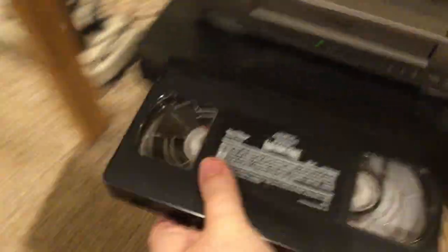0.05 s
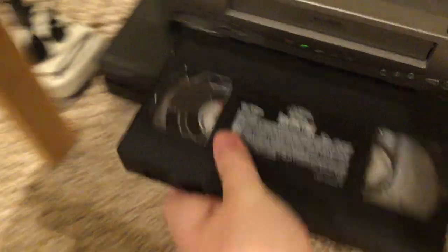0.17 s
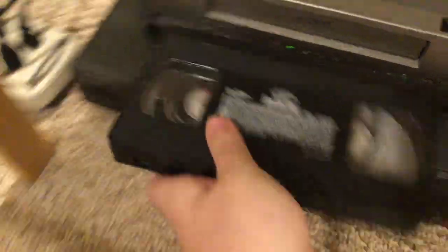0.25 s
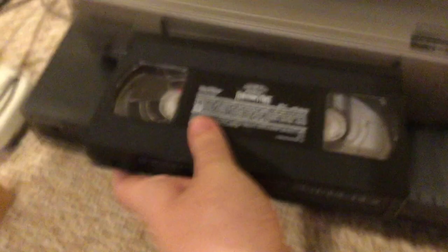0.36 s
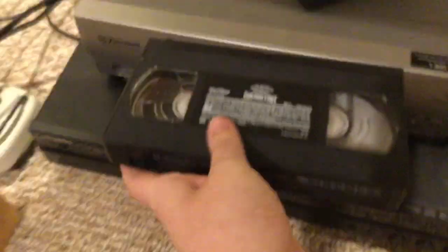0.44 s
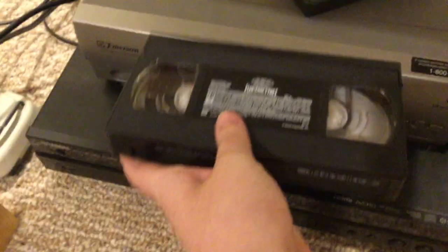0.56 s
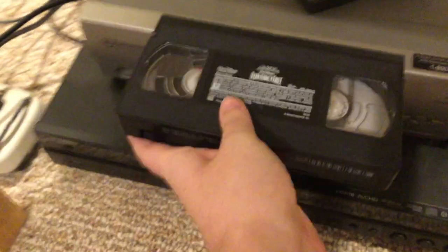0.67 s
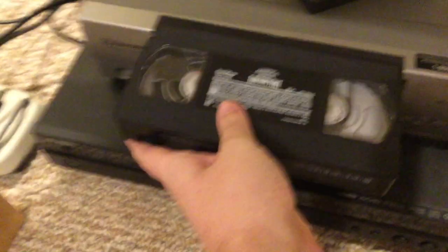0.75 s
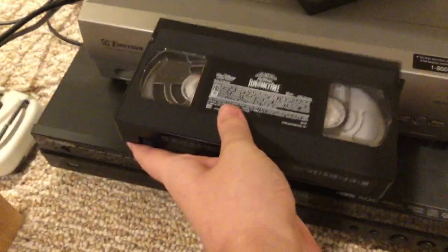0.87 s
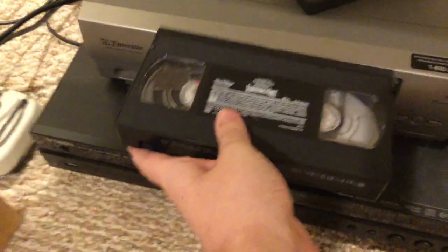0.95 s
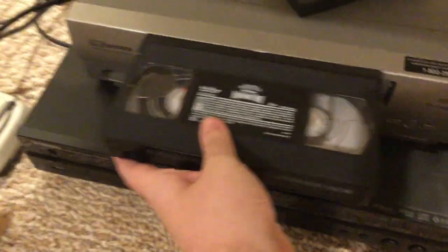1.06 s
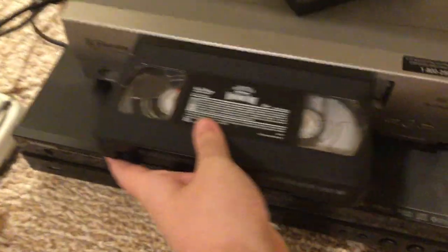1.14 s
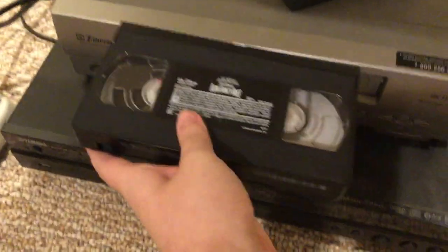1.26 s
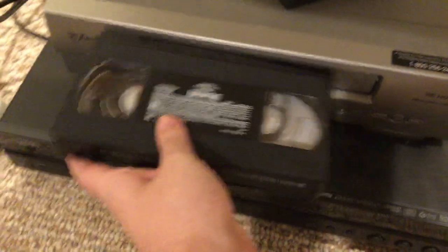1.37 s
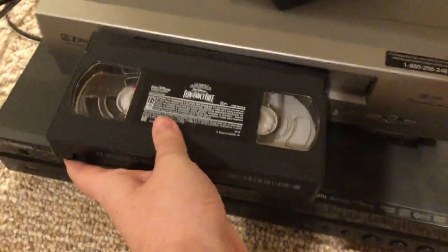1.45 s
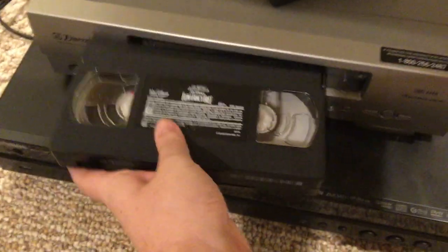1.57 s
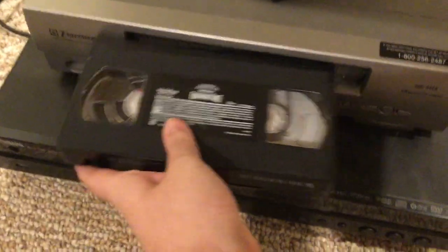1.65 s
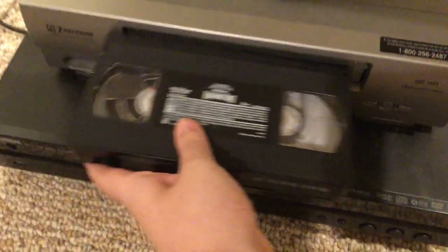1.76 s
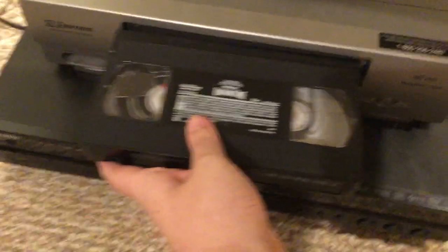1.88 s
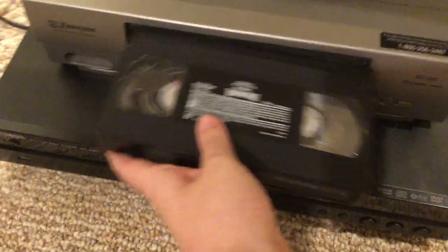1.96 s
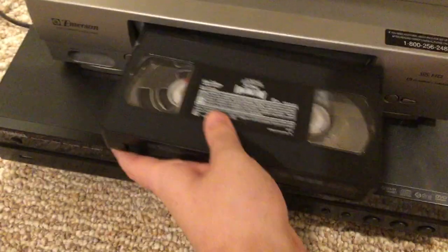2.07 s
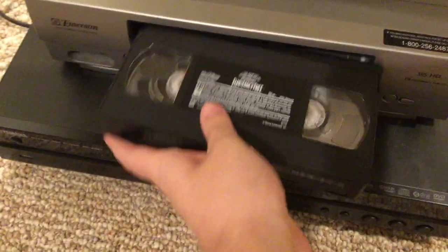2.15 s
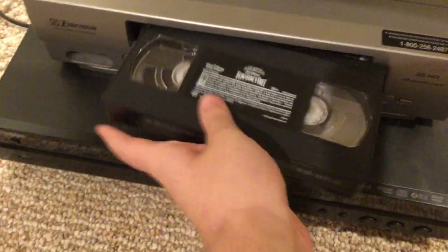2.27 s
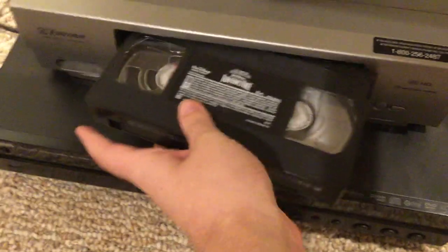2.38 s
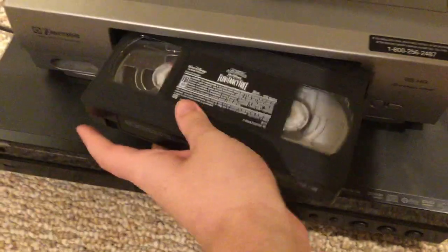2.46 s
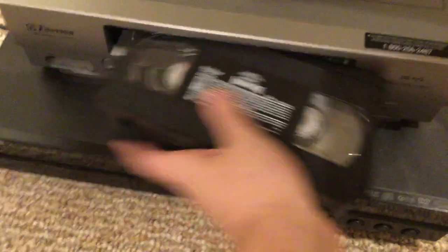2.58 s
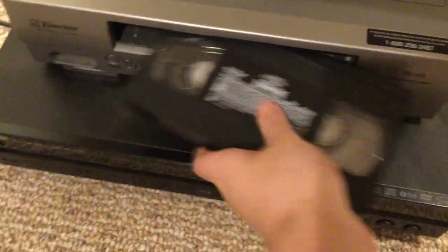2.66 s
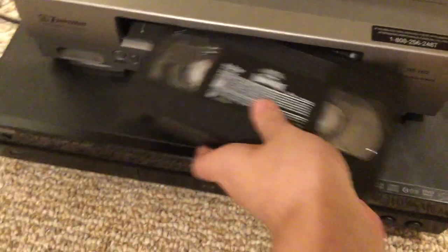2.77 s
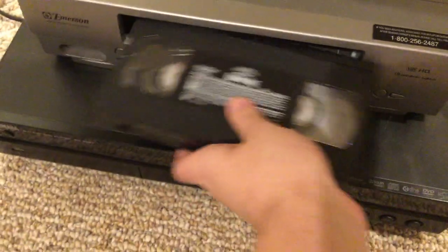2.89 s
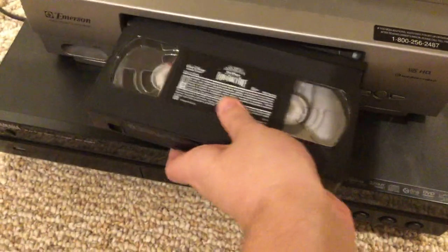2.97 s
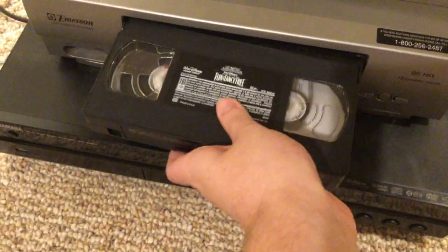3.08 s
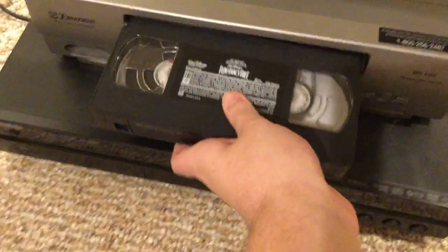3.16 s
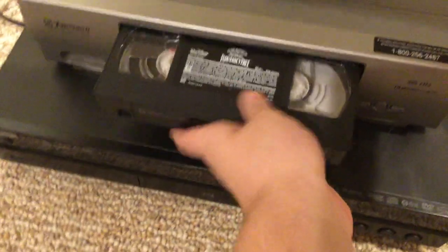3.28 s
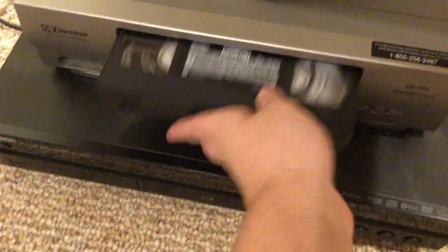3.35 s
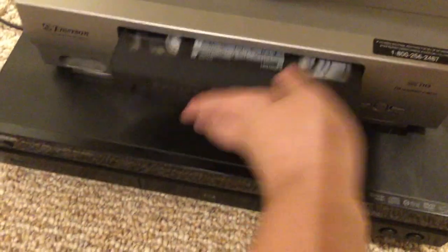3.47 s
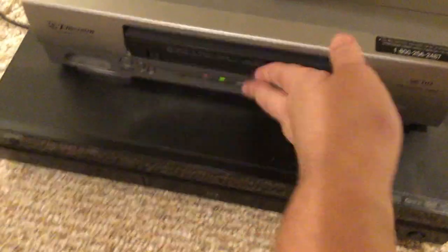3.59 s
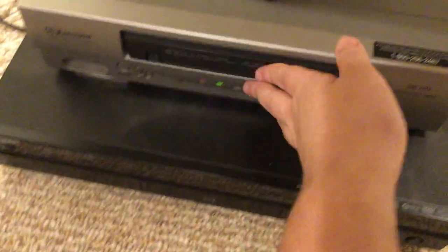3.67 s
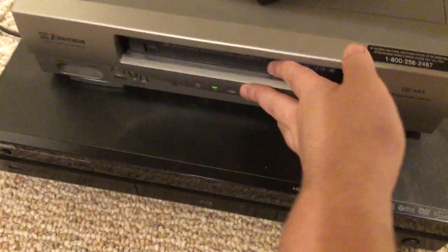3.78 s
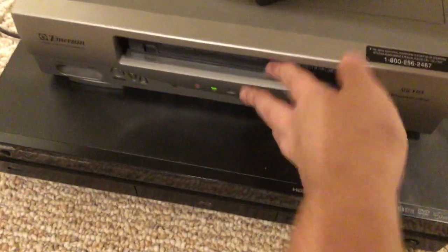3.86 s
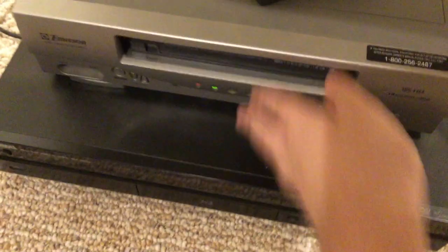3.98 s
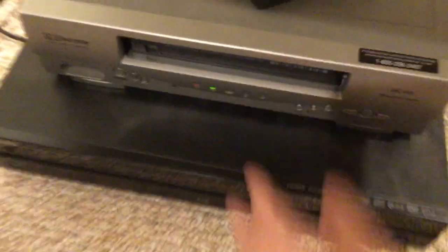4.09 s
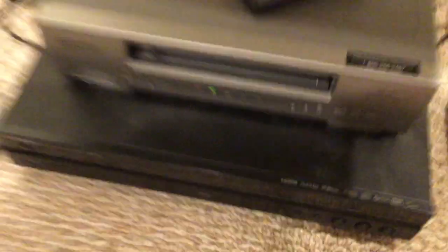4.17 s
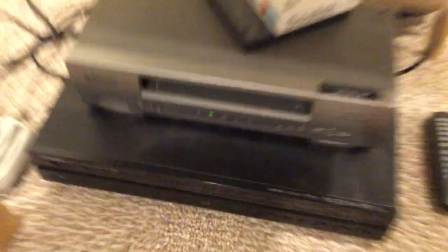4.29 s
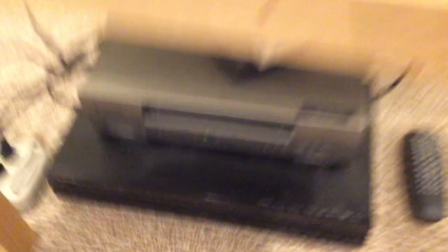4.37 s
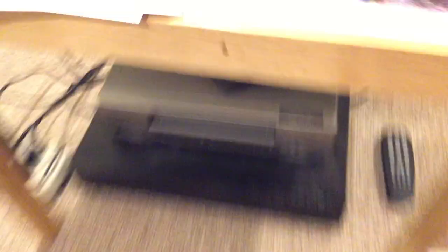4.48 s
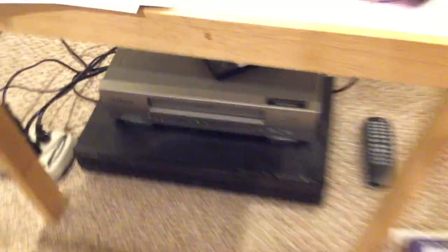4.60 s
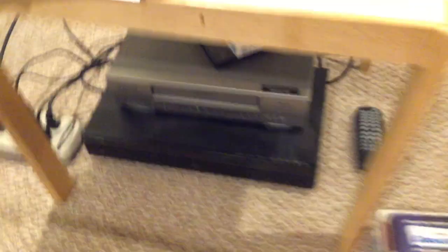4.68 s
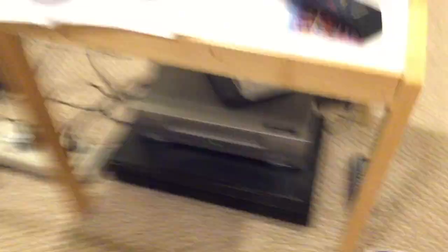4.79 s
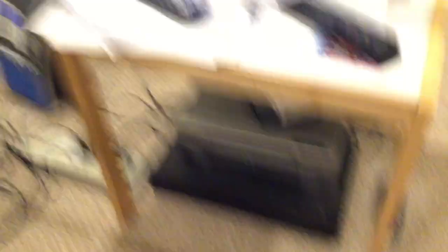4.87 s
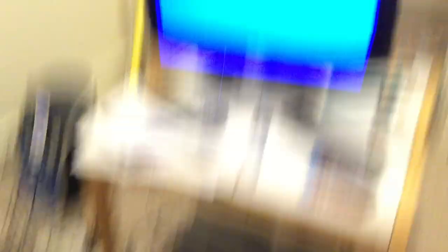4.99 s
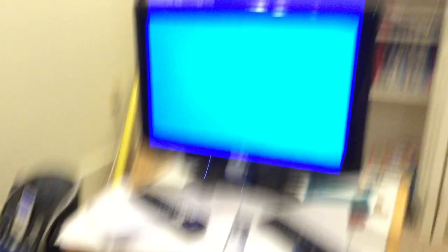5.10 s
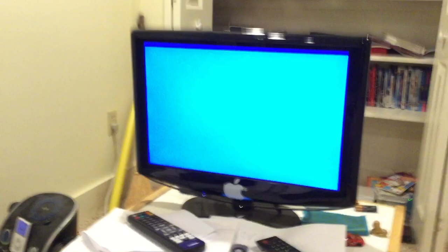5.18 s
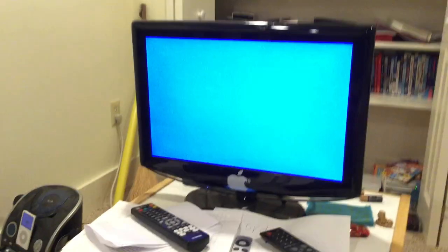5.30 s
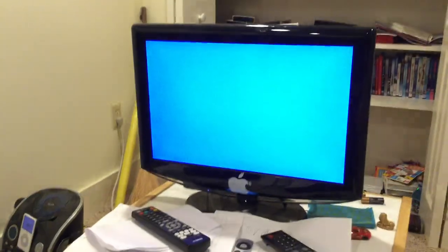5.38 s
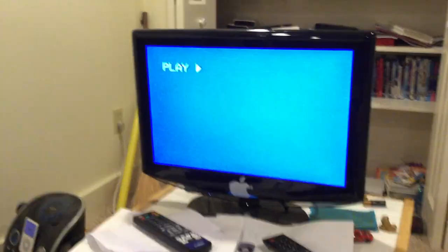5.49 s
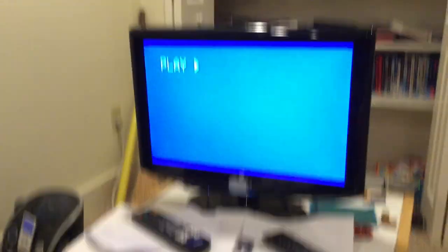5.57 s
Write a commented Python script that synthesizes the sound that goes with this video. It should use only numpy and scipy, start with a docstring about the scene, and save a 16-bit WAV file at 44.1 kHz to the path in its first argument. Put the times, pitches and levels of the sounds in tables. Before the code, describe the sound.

A hollow plastic video cassette knocks, scrapes and clatters against a player, slides into its slot, and a flap snaps shut.

```python
"""A video cassette is handled with faint clicks, then knocked hard on the front of a player near 0.5 s.
It is scraped along the front and pushed into the slot: grains of friction and blows ring its hollow plastic
shell, modelled as resonances over dense weak modes, and the cabinet's modes knock and drum underneath.
The slot flap snaps shut near 4.2 s; a few more slides follow and the handling fades after 5.2 s.
Throughout, a small room answers the blows, soft bumps reach the hand-held microphone and the air hums."""
import sys
import numpy as np
from scipy import signal
from scipy.fft import rfft, irfft, next_fast_len
from scipy.io import wavfile
from scipy.ndimage import map_coordinates

SR = 44100
rng = np.random.default_rng(int(sys.argv[2]) if len(sys.argv) > 2 else 0)


def inscribe(sig):
    """Save sig as 16-bit PCM at rate SR to the path in sys.argv[1].

    A 1-D sig is mono; a 2-D sig holds one channel per row.
    Samples are clipped to [-1, 1] before scaling.
    """
    pcm = np.round(np.clip(np.atleast_2d(sig).T, -1, 1) * 32767)
    wavfile.write(sys.argv[1], SR, pcm.astype(np.int16))


N = 248679
AGE_S = np.arange(SR // 3) / SR  # time since a blow

# cabinet modes: (frequency [Hz], width [Hz], level [dB])
CABINET_MODES = [(180, 69, -9), (242.4, 33, 1), (281.5, 56, -2.5), (369.5, 44.5, -1), (425, 37.2, -8),
                 (591, 45, -15), (767, 29, -21.5)]
# spectra of the shell's ringing, main and upper-mid register: (frequency [Hz], level [dB])
BODY_SPECTRUM = [(100, -25), (300, -2), (600, -1.5), (1400, -3), (2000, 1.5), (3000, -7.5), (5000, -20.5),
                 (9000, -45.5)]
EDGE_SPECTRUM = [(1000, -49.5), (2200, -20), (3000, 7.5), (4500, 0), (6000, -8.5), (9000, -13.5),
                 (16000, -52.5)]
# pushes that make plastic slide:
# (start [s], length [s], scrape level [dB], cabinet drone level [dB], hiss level [dB])
STROKES = [(0.038, 0.082, -80, -87, -78), (0.282, 0.45, -76, -90, -76.5), (0.497, 0.14, -61, -81, -84),
           (0.962, 0.14, -57, -49.5, -74), (1.136, 0.18, -71, -52.5, -79), (1.198, 0.16, -62, -50.5, -73.5),
           (1.394, 0.22, -53, -46, -68.5), (1.608, 0.23, -57, -52.5, -78), (1.773, 0.14, -59, -47, -66),
           (2.074, 0.34, -61, -41.5, -69), (2.315, 0.078, -44, -42.5, -67),
           (2.412, 0.069, -58.5, -40.5, -85), (2.589, 0.11, -56, -44, -70), (2.678, 0.16, -44, -48.5, -59),
           (2.87, 0.15, -43.5, -48, -57.5), (3.043, 0.14, -47, -36.5, -58), (3.192, 0.16, -66.5, -55, -92),
           (3.293, 0.23, -54.5, -49, -72.5), (3.383, 0.28, -51.5, -43.5, -66.5),
           (3.596, 0.13, -39, -38.5, -51), (3.796, 0.12, -52.5, -45, -74), (3.918, 0.2, -66, -53, -76),
           (4.149, 0.2, -57.5, -51.5, -72.5), (4.375, 0.12, -47.5, -45, -64),
           (4.451, 0.052, -37.5, -37.5, -44.5), (4.553, 0.13, -60, -56, -72.5),
           (4.704, 0.13, -57, -52, -70), (4.836, 0.25, -70, -62.5, -76.5), (5.247, 0.15, -77, -64.5, -95.5)]


def amp(db):
    """Decibels to gain."""
    return 10 ** (np.asarray(db) / 20)


def unit(x):
    """Scale to rms 1."""
    return x / np.sqrt(np.mean(x ** 2) + 1e-20)


def along(points, hz):
    """Read (Hz, value) points on a log frequency axis."""
    f, v = np.transpose(points)
    return np.interp(np.log(hz + 1), np.log(f + 1), v)


def filtered(x, response):
    """Multiply the spectrum of x by a response of frequency."""
    m = next_fast_len(len(x) + SR // 4)
    spectrum = rfft(x, m) * response(np.fft.rfftfreq(m, 1 / SR))
    return irfft(spectrum, m)[:len(x)]


def resonances(modes, f):
    """Causal response of damped modes in parallel, with alternating signs."""
    total = 0
    for k, (centre_hz, width_hz, db) in enumerate(modes):
        damping = 1j * f * width_hz
        total = total + (-1) ** k * amp(db) * damping / (centre_hz * centre_hz - f * f + damping)
    return total


def wobble(rate_hz):
    """Smooth random curve through rate_hz knots a second."""
    knots = rng.standard_normal(int(N * rate_hz / SR) + 4)
    return map_coordinates(knots, [np.arange(N) * rate_hz / SR])


def decay(t60_s):
    """Exponential decay of a blow."""
    return amp(-60 * AGE_S / t60_s)


def growth(t60_s):
    """Decay reversed in time: swells up to a blow."""
    return amp(-60 * AGE_S[::-1] / t60_s)


def fade(t60_s, rise_s):
    """Envelope of a blow: quick rise, exponential decay."""
    return decay(t60_s) * (1 - np.exp(-AGE_S / rise_s))


def add(track, time_s, sound):
    """Mix a sound into the track at time_s."""
    part = track[max(round(time_s * SR), 0):][:len(sound)]
    part += sound[:len(part)]


def air(level_db=-68, hum_hz=122, hum_db=-74):
    """Room tone as shaped noise, with the appliances' low hum as a phase-wandering sine."""
    # room tone spectrum: (frequency [Hz], level [dB])
    tone_spectrum = [(20, -23.5), (50, 3), (95, -4.5), (134, 11), (165, -2.5), (300, 0), (400, -21.5),
                     (900, -31.5), (2000, -18), (4500, -38), (12000, -31), (16000, -34)]
    rumble = unit(filtered(rng.standard_normal(N), lambda f: amp(along(tone_spectrum, f))))
    hum = np.sin(2 * np.pi * hum_hz * np.arange(N) / SR + 0.68 * wobble(24))
    return amp(level_db) * rumble + amp(hum_db) * hum


def room(x, build_up_s=0.0015):
    """The room's answer: a noise tail in which each frequency dies at its own speed."""
    # reverberation: (frequency [Hz], t60 [s])
    reverb_t60 = [(100, 0.49), (300, 0.24), (1500, 0.14), (4000, 0.14), (12000, 0.089)]
    hz, t, z = signal.stft(rng.standard_normal(SR // 2), SR, nperseg=256)
    decaying = z * amp(-60 * t / along(reverb_t60, hz)[:, None])
    tail = signal.istft(decaying, SR, nperseg=256)[1]
    tail *= 1 - np.exp(-(np.arange(len(tail)) / SR / build_up_s) ** 2)
    return signal.fftconvolve(x, tail / np.linalg.norm(tail))[:N]


def bumps(level_db=-2, low_hz=50, high_hz=170, rise_s=0.002, push_t60_s=0.035, rumble_gain=0.39):
    """Soft, heavy contacts leave a low damped push and a short noisy shudder."""
    # dull bumps: (time [s], level [dB re level_db], shudder t60 [s], push pitch [Hz])
    bump_events = [(0.301, -54, 0.049, 75), (0.463, -29, 0.097, 118), (0.686, -49, 0.089, 55),
                   (3.604, -36, 0.095, 105), (3.825, -44, 0.085, 96), (4.499, -37.5, 0.2, 104),
                   (4.863, -48, 0.15, 113), (5.264, -50.5, 0.036, 72), (5.337, -52.5, 0.08, 130),
                   (5.404, -48, 0.06, 67)]
    out = np.zeros(N)
    band = signal.butter(3, [low_hz, high_hz], "bandpass", fs=SR, output="sos")
    low_cut = signal.butter(2, low_hz, "highpass", fs=SR, output="sos")
    for time_s, db, t60_s, hz in bump_events:
        push = signal.sosfilt(low_cut, np.sin(2 * np.pi * hz * AGE_S) * decay(push_t60_s))
        rumble = unit(signal.sosfilt(band, rng.standard_normal(len(AGE_S)))) * fade(t60_s, rise_s)
        thud = push + rumble_gain * rumble
        add(out, time_s, amp(db + level_db) * thud / abs(thud).max())
    return out


def shell(f, dense_db):
    """Gain of the cassette shell: a few strong resonances over many weak ones."""
    # shell modes: (frequency [Hz], width [Hz], level [dB])
    shell_modes = [(530, 230, 1.5), (811.5, 22, 5), (998, 74, -1), (1164, 85, 5), (1487, 100, 0),
                   (1895, 170, -9), (2356, 130, -2), (2910, 170, -8.5), (3620, 250, -13), (4940, 140, -7.5),
                   (11100, 310, -11)]
    return np.hypot(abs(resonances(shell_modes, f)), amp(dense_db))


def shell_ring(spectrum, note_hz, note_db=4, note_q=7):
    """Undamped ringing of the shell's crowded modes; the struck panel stands out."""
    f = np.fft.rfftfreq(len(AGE_S), 1 / SR)
    panel = np.hypot(1, abs(resonances([(note_hz, note_hz / note_q, note_db)], f)))
    colour = amp(along(spectrum, f)) * shell(f, dense_db=-6) * panel
    return unit(irfft(rfft(rng.standard_normal(len(AGE_S))) * colour, len(AGE_S)))


def pushes(t, stop_t60_s, attack_s=0.034, swell_db=1.5, arch_db=3.5):
    """Power of each push (rows) at times t: gets moving, swells with speed and pressure, dies away."""
    start, length = np.transpose(STROKES)[:2, :, None]
    moving = np.clip((t - start) / attack_s, 0, 1)
    way = np.clip((t - start) / length, 0, 1)
    # the hand presses harder towards the end and moves fastest in the middle
    press_db = swell_db * (way - 0.5) + arch_db * (np.sin(np.pi * way) - 2 / np.pi)
    stop_db = -60 * np.clip((t - start - length) / stop_t60_s, 0, 2)
    return (moving * amp(press_db + stop_db)) ** 2


def stroke_levels(rub_stop_t60_s=0.13, drum_stop_t60_s=0.3, handling_end_s=5.17, handling_t60_s=1.6):
    """Scrape, drone and hiss strength: summed push powers over faint handling that fades at the end."""
    t = np.arange(0, N, 64) / SR
    _, _, scrape_db, drone_db, hiss_db = np.transpose(STROKES)
    # rubbing stops sooner than the cabinet's drumming
    rub, drum = pushes(t, rub_stop_t60_s), pushes(t, drum_stop_t60_s)
    let_go_db = -60 * np.maximum(t - handling_end_s, 0) / handling_t60_s
    # (push levels [dB], push power, level of the faint handling [dB])
    layers = [(scrape_db, rub, -79), (drone_db, drum, -72), (hiss_db, rub, -88)]
    levels = []
    for db, power, rest_db in layers:
        strength = np.sqrt(amp(db) ** 2 @ power + amp(rest_db + let_go_db) ** 2)
        levels.append(np.interp(np.arange(N) / SR, t, strength))
    return levels


def shudder(drone, level_db=-21, low_hz=90, high_hz=170):
    """The whole player shudders faintly, as low noise, under the pushes that drum on its cabinet."""
    band = signal.butter(2, [low_hz, high_hz], "bandpass", fs=SR, output="sos")
    return amp(level_db) * drone * unit(signal.sosfilt(band, rng.standard_normal(N)))


def grit(scrape, level_db=-7, snags_per_s=140, spread_db=4, t60_s=0.008):
    """Ribs and edges snag at random: single tiny clicks on top of the scrape."""
    snags = (rng.random(N) < snags_per_s / SR) * amp(spread_db * rng.standard_normal(N))
    click = shell_ring(BODY_SPECTRUM, note_hz=2880) * decay(t60_s)
    return amp(level_db) * scrape * unit(signal.fftconvolve(snags, click)[:N])


def sliding(drone_db=-2, scrape_db=-1, hiss_db=-1, catches_per_s=2500, smooth_gain=0.7, judder_db=1.87,
            scatter_gain=0.16, slips_per_s=130, soft_hz=330):
    """Textured plastic catches and slips in tiny grains that excite shell and cabinet."""
    # friction spectra: (frequency [Hz], level [dB])
    scrape_spectrum = [(250, -39), (480, -6), (1000, 6), (1800, -1), (3000, -7), (4500, -17), (6500, -24),
                       (12000, -46.5)]
    hiss_spectrum = [(2000, -25), (4000, 2), (5500, 2.5), (7500, 0), (12000, 0), (16000, -3)]
    scrape, drone, hiss = stroke_levels()
    grains = unit(rng.standard_normal(N) * (rng.random(N) < catches_per_s / SR))
    friction = (grains + smooth_gain * rng.standard_normal(N)) * amp(judder_db * wobble(45))

    # the whole cassette moves in coarser jerks, which drum on the cabinet
    jerks = unit(np.sign(rng.standard_normal(N)) * (rng.random(N) < slips_per_s / SR))
    drumming = filtered(jerks + friction / 2,
                        lambda f: resonances(CABINET_MODES, f) * f / np.hypot(f, soft_hz))
    out = amp(drone_db) * drone * unit(drumming)

    # each grain clicks, then scatters through the shell; the touching spot wanders
    spots = []
    for _ in range(6):
        scatter = rng.standard_normal(len(AGE_S)) * fade(t60_s=0.047, rise_s=0.0002)
        spots.append(signal.fftconvolve(friction, scatter)[:N])
    touch = np.array([wobble(12) for _ in spots])
    scattered = np.sum(touch * spots, axis=0) / np.linalg.norm(touch, axis=0)
    rubbed = friction + scatter_gain * scattered
    scraping = filtered(rubbed, lambda f: amp(along(scrape_spectrum, f)) * shell(f, dense_db=10.0))
    out += amp(scrape_db) * scrape * unit(scraping)
    out += shudder(drone) + grit(scrape)
    hissing = filtered(rubbed, lambda f: amp(along(hiss_spectrum, f)))
    return out + amp(hiss_db) * hiss * unit(hissing)


def knocks(level_db=-1, push_t60_s=0.022, lead_s=0.00306):
    """A short damped push rings the cabinet modes nearest its own pitch; they take a moment to swell."""
    # blows that reach the cabinet: (time before lead_s [s], level [dB re level_db], push pitch [Hz])
    cabinet_blows = [(0.251, -57, 190), (0.467, -31, 358), (0.743, -43.5, 340), (0.78, -26.5, 240),
                     (1.034, -40, 244), (1.482, -29, 290), (1.559, -23.5, 285), (1.638, -29.5, 564),
                     (1.837, -30.5, 400), (2.084, -31, 377), (2.158, -45, 312), (2.225, -27, 387),
                     (2.451, -29, 267), (2.572, -32, 241), (2.734, -29.5, 344), (3.041, -27, 398),
                     (3.077, -31, 383), (3.532, -28.5, 222), (3.602, -17.5, 280), (3.676, -24, 355),
                     (3.703, -29.5, 244), (4.056, -42.5, 356), (4.155, -39.5, 330), (4.434, -30, 224),
                     (4.495, -22, 203), (4.503, -23.5, 230), (4.775, -39, 228), (5.072, -44, 231)]
    out = np.zeros(N)
    for time_s, db, hz in cabinet_blows:
        push = np.sin(2 * np.pi * hz * AGE_S) * decay(push_t60_s)
        ring = filtered(push, lambda f: resonances(CABINET_MODES, f))
        add(out, time_s - lead_s, amp(db + level_db) * ring / abs(ring).max())
    return out


def flap(ring_db=-18, crack_db=-10.0, crack_t60_s=0.044, rise_s=0.0011, low_hz=1200, bright_hz=4500,
         damping_t60_s=0.14, swing_db=-24, swing_t60_s=0.035):
    """The sprung flap brushes its frame and slaps its stop: a bright crack and a short ring."""
    # slot flap shuts: (time [s], level [dB])
    flap_events = [(4.155, -16.5)]
    # flap modes: (frequency [Hz], level [dB], t60 before the stop's damping [s])
    flap_modes = [(1080, -3, 0.066), (1940, 3, 0.049), (2410, -3, 0.043), (2280, 6.5, 0.1),
                  (3390, 5.5, 0.048), (3450, 2.5, 0.04), (3750, 4, 0.05), (4900, -25, .04),
                  (8700, 5, 0.042)]
    out = np.zeros(N)
    colour = lambda f: f / np.hypot(f, low_hz) / np.hypot(f, bright_hz)
    for time_s, db in flap_events:
        ring = np.zeros(len(AGE_S))
        for hz, mode_db, t60_s in flap_modes:
            tone = np.sin(2 * np.pi * (hz * AGE_S + rng.random()))
            ring += amp(mode_db) * tone * fade(t60_s, rise_s)
        ring *= decay(damping_t60_s)  # the stop deadens the flap
        crack = unit(filtered(rng.standard_normal(len(AGE_S)), colour)) * fade(crack_t60_s, rise_s)
        add(out, time_s, amp(db) * (amp(ring_db) * ring + amp(crack_db) * crack))
        swing = shell_ring(EDGE_SPECTRUM, note_hz=3300) * growth(swing_t60_s)
        add(out, time_s - len(AGE_S) / SR, amp(db + swing_db) * swing)
    return out


def contacts(table, rise_s, flex_db, body_db=-11, edge_db=-5, snap_db=-4, edge_life=0.53, snap_life=0.44,
             graze_db=-20, graze_t60_s=0.027, flex_t60_s=0.0086):
    """Plastic meets plastic: the parts graze, then seat; the shell's higher registers die sooner."""
    # spectrum of the treble register: (frequency [Hz], level [dB])
    snap_spectrum = [(3000, -13), (5500, -0.5), (7500, -8), (11000, -5.5), (15000, -9), (18000, -22.5)]
    out = np.zeros(N)
    graze = amp(graze_db) * growth(graze_t60_s)
    for time_s, db, mid_db, top_db, t60_s, note_hz in table:
        body = amp(body_db) * shell_ring(BODY_SPECTRUM, note_hz)
        edge = amp(edge_db + mid_db) * shell_ring(EDGE_SPECTRUM, note_hz)
        snap = amp(snap_db + top_db) * shell_ring(snap_spectrum, note_hz)
        envelope = fade(t60_s, rise_s)
        ring = body * envelope
        ring += edge * fade(t60_s * edge_life, rise_s)
        ring += snap * fade(t60_s * snap_life, rise_s)
        # the struck panel swings a few times before its energy spreads through the shell
        flex = amp(flex_db) * np.sin(2 * np.pi * note_hz * AGE_S) * fade(flex_t60_s, rise_s)
        add(out, time_s, amp(db) * (ring / envelope.max() + flex))
        add(out, time_s - len(AGE_S) / SR, amp(db) * (body + edge) * graze)
    return out


def scuffs(treble_db=0.5, t60_s=0.095, note_hz=1900):
    """Glancing contacts swell slowly; the sharper the touch, the more upper mids and treble."""
    # scuffing contacts: (time [s], level [dB], brightness [dB])
    scuff_events = [(1.026, -40, -18), (1.831, -31.5, -4), (2.044, -35.5, -15.5), (2.337, -37.5, -9.5),
                    (3.491, -44, -9), (3.591, -31, -6), (3.645, -35, -2), (4.417, -35.5, -7),
                    (4.443, -37.5, 3.5), (4.475, -32, -8), (4.49, -24, -10.5), (4.735, -40, -4),
                    (4.771, -39, -14), (4.933, -44, -20), (5.041, -47, -19), (5.245, -52.5, -24),
                    (5.375, -51, -25.5)]
    rows = [(time_s, db, bright_db, bright_db + treble_db, t60_s, note_hz)
            for time_s, db, bright_db in scuff_events]
    return contacts(rows, rise_s=0.01, flex_db=6.5)


def clacks():
    """Direct blows on the hollow plastic shell: fast rise and a ringing struck panel."""
    # plastic contacts: (time [s], level [dB], upper-mid level [dB], treble level [dB],
    # ring t60 [s], note of the struck panel [Hz])
    clack_events = [(0.162, -66.5, -22, 3, 0.04, 756), (0.249, -54, -30, -30, 0.025, 1110),
                    (0.464, -9, -11, -21, 0.027, 1377), (0.484, -35, -22, -9, 0.032, 1240),
                    (0.741, -30, -18, -25.5, 0.12, 1040), (0.777, -23, -10, -18, 0.1, 1175),
                    (0.909, -45, -20, -39, 0.047, 1280), (1.146, -55.5, -5, -18, 0.077, 1120),
                    (1.248, -31, -11.5, -21, 0.061, 2790), (1.475, -17.5, -10.5, -10, 0.071, 2920),
                    (1.49, -27.5, -2, -5, 0.13, 2180), (1.552, -23.5, -2, -4, 0.059, 1760),
                    (1.634, -24.5, -7.5, -18, 0.057, 1870), (1.712, -35.5, -13, -34, 0.029, 1080),
                    (2.076, -14.5, -7.5, -1.5, 0.04, 3780), (2.087, -23, -8.5, -8.5, 0.095, 2800),
                    (2.153, -25, -5.5, -9, 0.061, 1110), (2.215, -21.5, -7, -9, 0.093, 2930),
                    (2.286, -32.5, -17, -32, 0.21, 697), (2.454, -34.5, -8.5, -22, 0.067, 1180),
                    (2.573, -36.5, -20, -30, 0.053, 821), (2.616, -29, -8.5, -37, 0.041, 1040),
                    (3.039, -22, -10, -10, 0.14, 1160), (3.059, -19.5, -13, -19, 0.08, 1450),
                    (3.125, -33, -6, -29, 0.03, 2550), (3.143, -21.5, -11, -12, 0.089, 660),
                    (3.178, -36.5, -14, -9.5, 0.06, 789), (3.46, -38, -2, -21, 0.062, 1100),
                    (3.53, -22.5, -10.5, -15.5, 0.18, 1020), (3.604, -20, -7.5, -14.5, 0.079, 1990),
                    (3.697, -33, 1, -0.5, 0.059, 1000), (3.802, -36.5, -21, -34, 0.086, 1140),
                    (3.848, -30.5, -8, -24, 0.1, 1170), (3.891, -28, -6.5, -19, 0.059, 2400),
                    (4.012, -35.5, -22, -15, 0.083, 1690), (4.217, -38.5, -2, -2.5, 0.083, 1170),
                    (4.914, -35.5, -28, -25, 0.07, 1210)]
    return contacts(clack_events, rise_s=0.0012, flex_db=1.5)


def scene(room_db=-12):
    """Blows and their echo over bumps, sliding and room tone."""
    blows = clacks() + scuffs() + knocks() + flap()
    return (blows + amp(room_db) * room(blows) + bumps() + sliding() + air())[None]


def record(dry, low_cut_hz=38, top_hz=16000):
    """The small microphone loses the deepest bass; the recorder cuts steeply above its band limit."""
    low_cut = signal.butter(2, low_cut_hz, "highpass", fs=SR, output="sos")
    thin = signal.sosfilt(low_cut, dry[0])
    return filtered(thin, lambda f: 1 / np.sqrt(1 + (f / top_hz) ** 120))[None]


dry = scene()
out = record(dry)
inscribe(out)
```